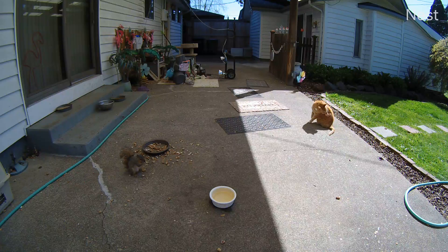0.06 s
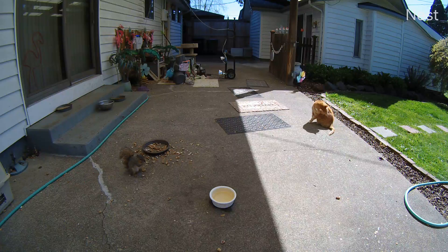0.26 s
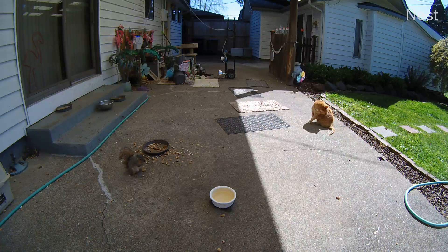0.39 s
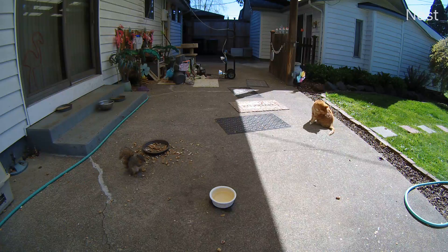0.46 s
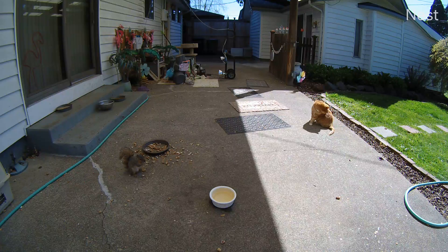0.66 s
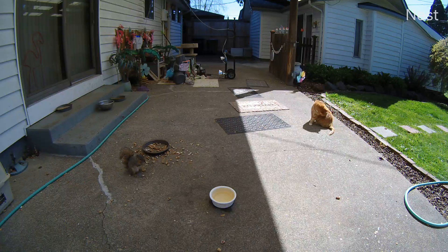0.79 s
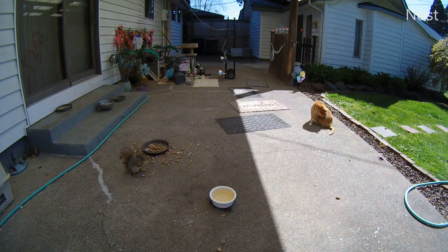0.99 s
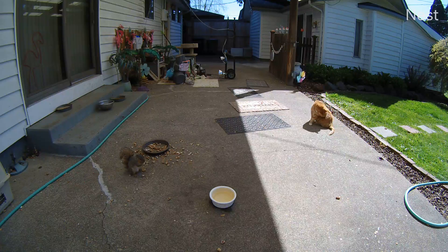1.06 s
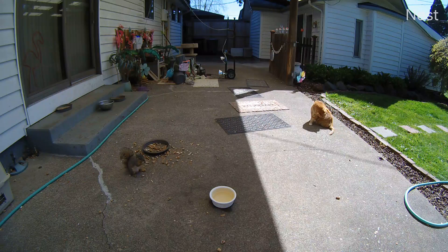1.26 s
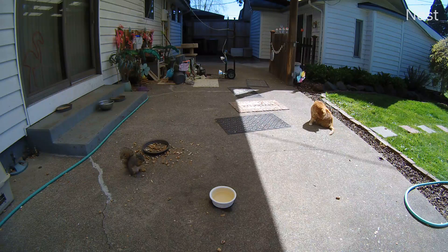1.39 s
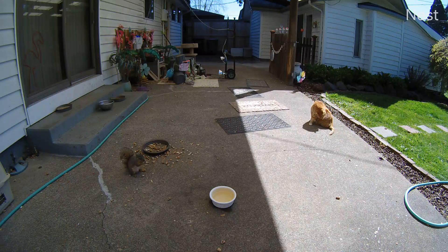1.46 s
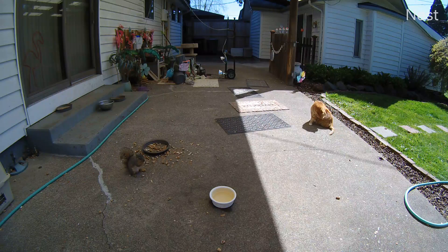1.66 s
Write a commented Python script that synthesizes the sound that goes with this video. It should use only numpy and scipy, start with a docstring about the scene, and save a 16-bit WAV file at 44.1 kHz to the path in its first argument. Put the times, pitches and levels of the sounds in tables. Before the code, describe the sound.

Squirrel teeth crunch and snap seed husks in dry uneven bursts, over faint outdoor hiss

```python
"""Squirrel gnawing seeds

On a concrete patio a squirrel gnaws seeds beside a dish, a few metres from a small outdoor camera's microphone.
Each bite is a burst of random clicks ringing the modes of shell and teeth; hard taps are the shell cracks.
Short wavering tones squeak among them, and house walls return a faint echo of decaying noise.
Behind lie soft low thuds and distant traffic and hiss, made of noise in flickering third-octave bands."""
import sys
import numpy as np
from scipy import signal
from scipy.fft import rfft, irfft
from scipy.io import wavfile
from scipy.ndimage import uniform_filter1d

SR = 44100
rng = np.random.default_rng(int(sys.argv[2]) if len(sys.argv) > 2 else 0)


def file_out(sig):
    """Save sig as 16-bit WAV at sys.argv[1]."""
    # one column per channel
    cols = np.atleast_2d(sig).T
    # limit, then scale
    lim = np.clip(cols, -1, 1)
    pcm = np.round(lim * 32767).astype(np.int16)
    wavfile.write(sys.argv[1], SR, pcm)


def elevation(decibels):
    """Turn decibel levels (scalar or array-like) into linear amplitude ratios."""
    levels = np.asarray(decibels, float)
    return 10 ** (levels / 20)


N = 77175

# Resonances of shell and teeth: (frequency [Hz], relative level [dB])
SHELL_MODES = [(2600, -15.5), (2950, 3), (3280, 3), (3550, -2.5), (3850, -7), (4620, 1.5), (4780, 3),
               (5050, 7), (5290, 6), (5590, -1), (5800, -14.5), (6230, -3), (6500, -12), (6770, -5)]
# Bites through husk: (start [s], length [s], level [dB], lower shell modes [dB], broad grit [dB])
BITE_TABLE = [(0.0, .025, -48, -8, 8), (0.059, 0.056, -60, 0, 0), (0.202, .035, -51, -6, 0),
              (0.2405, .008, -42, -26, -20), (.249, .008, -36, -26, -20), (0.256, 0.024, -31, -3.5, -28),
              (.281, .09, -41, -7, -16), (0.416, .024, -44, -6, 8), (0.46, 0.03, -43.5, -2, 6),
              (0.615, 0.03, -49.5, -10, 6), (0.68, 0.03, -53, -6, 0), (0.782, 0.062, -56.5, -14.5, 0),
              (0.896, 0.023, -42, -8, 8), (.92, .018, -50, -8, 4), (0.939, .019, -38.5, -3, -6),
              (.959, .017, -47, -8, 2), (0.977, 0.024, -38, -9, 4), (1.002, .016, -46, -8, 4),
              (1.019, 0.021, -35, -6, 10), (1.04, .05, -47, -3, 14), (1.385, 0.035, -56, -12, -2),
              (1.543, 0.033, -57, -8, 2), (1.585, 0.03, -55, -10, 2)]
# Spectrum of the distant air: (frequency [Hz], relative level per Hz [dB])
AIR_SPECTRUM = [(88, -47), (150, -26.5), (196, -10.5), (457, -2), (1020, 2.5), (2580, -14.5), (4860, -5.5),
                (6660, -13), (7480, -3.5), (8000, -61), (10400, -92), (17600, -120)]
# Slow drift of the treble of the air: (time [s], level [dB])
TREBLE_DRIFT = [(0, 5), (.5, 8.5), (1.1, 0), (1.3, 1), (1.75, 1)]
# Level of the faint top band, heard near 7-8 kHz, that comes and goes: (time [s], level [dB])
TOP_BAND_LEVEL = [(0, -17), (.37, -54.5), (.41, -9.5), (.74, -11), (.78, -24), (0.841, -32), (0.868, -7.5),
                  (1.06, -9.5), (1.088, -52), (1.33, -24), (1.37, -2), (1.441, -1.5), (1.48, -47),
                  (1.54, -38), (1.6, -6.5), (1.66, -28), (1.75, -45)]
# Squeaks of tooth on husk: (start [s], length [s], frequency [Hz], level [dB])
SQUEAK_TABLE = [(.2395, .01, 5100, -30), (.879, .016, 4950, -49), (1.404, .018, 5050, -52),
                (1.545, .03, 5300, -53), (1.594, .012, 5250, -51), (1.703, .017, 5280, -48),
                (1.725, .014, 5250, -57)]
# Soft low thuds: (start [s], length [s], frequency [Hz], level [dB])
THUD_TABLE = [(0.24, 0.06, 61.3, -89), (.33, 0.1, 90, -89.5), (.52, 0.08, 152, -83),
              (0.787, 0.088, 100, -79), (0.899, .1, 262, -66), (1.04, 0.16, 139, -81.5),
              (1.195, 0.17, 147, -84.5), (1.379, 0.042, 173, -62.5), (1.478, 0.087, 100, -79),
              (1.581, 0.062, 130, -71)]
# Shell cracks: (time [s], level [dB], lower shell modes [dB], broad snap [dB], dull knock [dB])
CRACK_TABLE = [(.2505, -27, -20, -25, -5), (.2612, -18, 1, -22, -12), (.2675, -20, -4, -22, -11),
               (.2735, -17, -5, -22, -10), (.429, -35, -5, -3, -40), (.473, -35, 6, -8, -40),
               (.9405, -23, 2, -12, -40), (.9855, -18.5, -10, -9, -40), (.996, -29, -6, -3, -40),
               (1.0245, -28, -3, 0, -40), (1.029, -21, -3, 0, -32), (1.0365, -29, -5, -3, -40),
               (1.6082, -36, -3, -3, -40)]

LOWER_HZ = 4000  # shell modes below this are the lower ones
MODE_SCATTER_DB, DETUNE_SHARE = 2, .008  # standard deviations from seed to seed
RING_RISE_S, SHELL_T60_S, SHELL_LOW_HZ = .0005, .022, 2300
SNAP_HZ, SNAP_WIDTH_HZ = 4600, 4600
CRACKLE_PER_S, CRACKLE_SPREAD_DB = 3400, -2
BITE_EDGE_S, BITE_FADE_DB_PER_S = 0.00044, 130
AIR_DB, FLICKER_DB = -58.5, 2.5  # overall level before flicker and drift; standard deviation of the flicker
SQUEAK_WOBBLE_HZ = 120
KNOCK_HZ, KNOCK_T60_S = 1150, .0028
ECHO_DB, ECHO_T60_S, ECHO_GAP_S = -13, .2, .008
LOW_HZ, TOP_HZ = 165, 6850
DIP_HZ, DIP_WIDTH_HZ, DIP_SHARE = 4300, 400, .2  # dip of the microphone port
STRIPE_STEEP, STRIPE_AT_DB, STRIPE_FLOOR_DB, STRIPE_FROM_HZ = 6, -0.8, -26, 2100  # steepness in dB per dB
NOISE_DB = -99.5


def rms(x):
    """Root mean square."""
    return np.sqrt(np.mean(x ** 2))


def band(x, lo_hz, hi_hz, order=2):
    """Band-pass."""
    return signal.sosfilt(signal.butter(order, [lo_hz, min(hi_hz, 20000)], "band", fs=SR, output="sos"), x)


def highpass(x, hz, order=4):
    """High-pass."""
    return signal.sosfilt(signal.butter(order, hz, "high", fs=SR, output="sos"), x)


def add(out, x, s):
    """Mix x into out at s seconds."""
    i = max(int(s * SR), 0)
    out[i:i + len(x)] += x[:N - i]


def shell(lower_db, snap_db):
    """One tap: a broad snap and decaying modes, each seed a little different."""
    t = np.arange(2600) / SR
    hz, db = np.array(SHELL_MODES).T[:, :, None]
    scatter, detune, phase = rng.standard_normal((3, len(SHELL_MODES), 1))
    db = db + lower_db * (hz < LOWER_HZ) + MODE_SCATTER_DB * scatter
    hz = hz * (1 + DETUNE_SHARE * detune)
    modes = elevation(db) * np.sin(2 * np.pi * hz * t + np.pi * phase)
    envelope = 1000. ** (-t / SHELL_T60_S) * (1 - np.exp(-t / RING_RISE_S))
    ring = modes.sum(axis=0) * envelope
    snap = band(1. * (t == 0), SNAP_HZ - SNAP_WIDTH_HZ / 2, SNAP_HZ + SNAP_WIDTH_HZ / 2)
    tap = ring / abs(ring).max() + elevation(snap_db) * snap / abs(snap).max()
    return highpass(tap, SHELL_LOW_HZ)


def bites():
    """Teeth grind through a husk: dense uneven clicks, each ringing the shell, for a moment."""
    out, t = np.zeros(N), np.arange(4000) / SR
    for s, length, db, lower_db, grit_db in BITE_TABLE:
        hit = rng.random(len(t)) < CRACKLE_PER_S / SR
        size = elevation(CRACKLE_SPREAD_DB * rng.exponential(size=len(t)))
        clicks = hit * size * rng.choice([-1, 1], size=len(t))
        edges = np.clip(np.minimum(t, length - t) / BITE_EDGE_S, 0, 1)
        fade = elevation(-BITE_FADE_DB_PER_S * t)
        burst = signal.fftconvolve(clicks * edges * fade, shell(lower_db, grit_db))
        add(out, burst * elevation(db) / rms(burst[:int(length * SR)]), s)
    return out


def air():
    """Distant traffic and hiss in third-octave bands that flicker alone; the treble drifts."""
    out, t = 0, np.arange(N) / SR
    f = np.fft.rfftfreq(N, 1 / SR) + 1
    hz, level_db = np.array(AIR_SPECTRUM).T
    shape = elevation(np.interp(np.log(f), np.log(hz), level_db)) * (f > LOW_HZ)
    noise = rfft(rng.standard_normal(N)) * shape
    third_octave = np.round(3 * np.log2(f / 150))
    scale = elevation(AIR_DB) / rms(irfft(noise, N))
    for k in range(19):
        db = FLICKER_DB * np.interp(t, np.linspace(0, t[-1], num=24), rng.standard_normal(24))
        # bands centred on 2400 Hz and above drift
        db = db + (k > 11) * np.interp(t, *np.array(TREBLE_DRIFT).T)
        out = out + elevation(db) * irfft(noise * (third_octave == k), N)
    return out * scale


def squeaks():
    """A tooth slips on the husk: a short tone of wavering pitch."""
    out, t = np.zeros(N), np.arange(2000) / SR
    for s, length, hz, db in SQUEAK_TABLE:
        wobble = np.interp(t, np.linspace(0, t[-1], num=16), rng.standard_normal(16))
        f = hz + SQUEAK_WOBBLE_HZ * wobble
        tone = np.sin(2 * np.pi * np.cumsum(f) / SR)
        swell = np.sin(np.pi * np.clip(t / length, 0, 1))
        add(out, elevation(db) * tone * swell, s)
    return out


def thuds():
    """Faint low puffs: narrow bands of noise that swell and fade."""
    out = np.zeros(N)
    for s, length, hz, db in THUD_TABLE:
        # leave out the onset of the filter
        puff = band(rng.standard_normal(8000), hz / 1.5, hz * 1.6, order=4)[2000:]
        t = np.arange(len(puff)) / SR
        swell = np.sin(np.pi * np.clip(t / length, 0, 1))
        add(out, elevation(db) * puff / rms(puff) * swell, s)
    return out


def cracks():
    """A husk splits: one hard tap of the shell with a dull, fast-decaying knock under it."""
    out, t = np.zeros(N), np.arange(2600) / SR
    knock = np.sin(2 * np.pi * KNOCK_HZ * t) * 1000. ** (-t / KNOCK_T60_S)
    for s, db, lower_db, snap_db, knock_db in CRACK_TABLE:
        tap = shell(lower_db, snap_db)
        add(out, elevation(db) * (tap + elevation(knock_db) * knock), s)
    return out


def echo(near):
    """House walls answer after a short gap with a decaying tail of noise."""
    t = np.arange(SR // 2) / SR
    tail = rng.standard_normal(len(t)) * 1000. ** (-t / ECHO_T60_S) * (t > ECHO_GAP_S)
    tail = tail / np.sqrt(np.sum(tail ** 2))
    return elevation(ECHO_DB) * signal.fftconvolve(near, tail)[:N]


def scene():
    """The squirrel, its echo between house walls, the thuds and the air."""
    near = highpass(bites() + squeaks() + cracks(), LOW_HZ)
    return (near + echo(near) + thuds() + air())[None]


def treble_stripes(x):
    """The treble thins into swishy stripes: narrow bands weaker than their neighbours are turned down."""
    f, _, z = signal.stft(x, SR, nperseg=2048, noverlap=1536, window="hann")
    power = abs(z) ** 2 + 1e-20
    share = uniform_filter1d(power, size=4, axis=0) / uniform_filter1d(power, size=24, axis=0)
    # averaged over seven frames of 46 ms that overlap
    rel_db = 10 * np.log10(uniform_filter1d(share, size=7, axis=1)) - STRIPE_AT_DB
    db = np.clip(STRIPE_STEEP * rel_db, STRIPE_FLOOR_DB, 0) * (f[:, None] > STRIPE_FROM_HZ)
    return signal.istft(z * elevation(db), SR, nperseg=2048, noverlap=1536, window="hann")[1][:N]


def top_cut(x):
    """Nothing passes above the cut-off."""
    return signal.sosfilt(signal.butter(12, 8860, fs=SR, output="sos"), x)


def record(dry):
    """The microphone port dips near 4.3 kHz; striped treble ends steeply, a top band comes and goes, hiss joins."""
    dip = band(dry[0], DIP_HZ - DIP_WIDTH_HZ / 2, DIP_HZ + DIP_WIDTH_HZ / 2, order=1)
    x = treble_stripes(dry[0] - DIP_SHARE * dip)
    cut = signal.sosfilt(signal.ellip(10, .3, 75, TOP_HZ, fs=SR, output="sos"), x)
    top_db = np.interp(np.arange(N) / SR, *np.array(TOP_BAND_LEVEL).T)
    top_band = elevation(top_db) * band(x, 5230, 8010, order=4)
    hiss = highpass(elevation(NOISE_DB) * rng.standard_normal(N), LOW_HZ)
    mix = (cut + top_band + hiss)[None]
    return top_cut(mix)


dry = scene()
out = record(dry)
file_out(out)
```